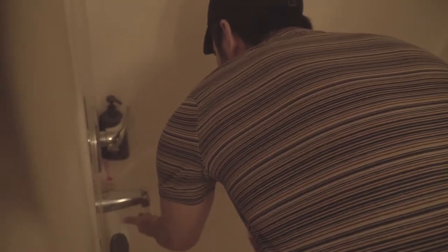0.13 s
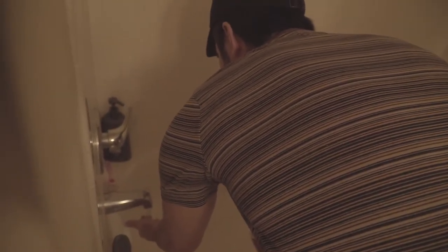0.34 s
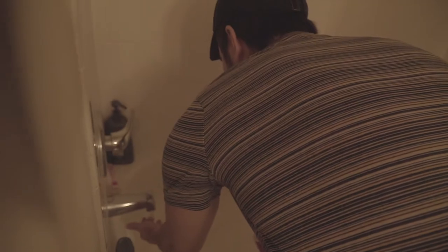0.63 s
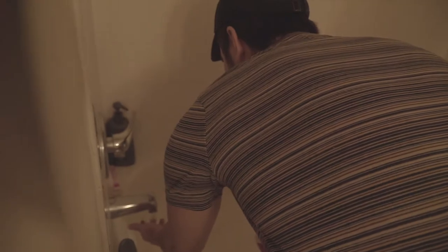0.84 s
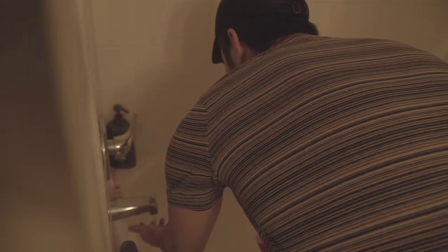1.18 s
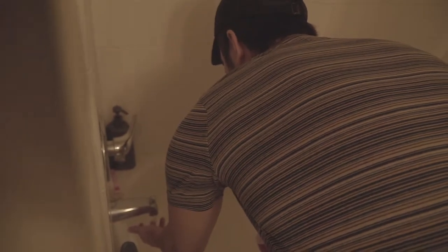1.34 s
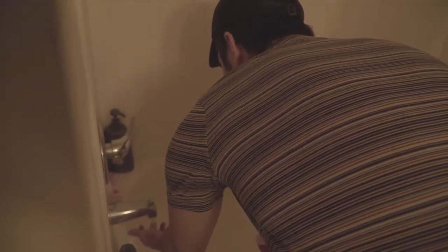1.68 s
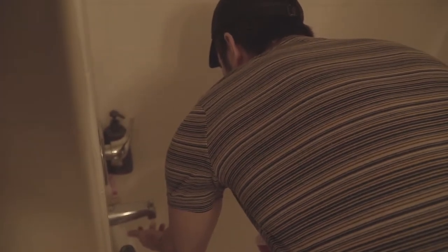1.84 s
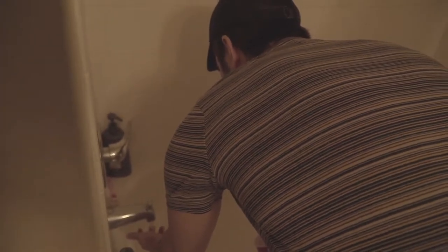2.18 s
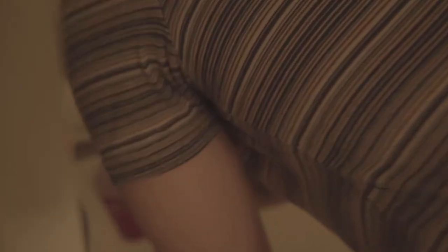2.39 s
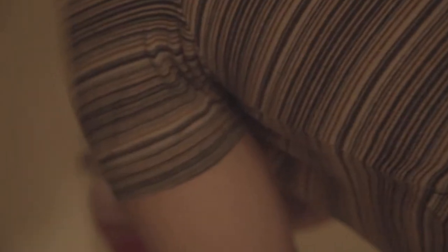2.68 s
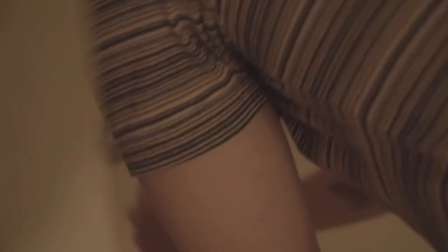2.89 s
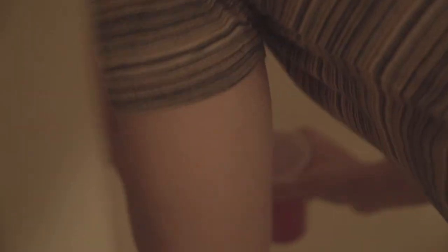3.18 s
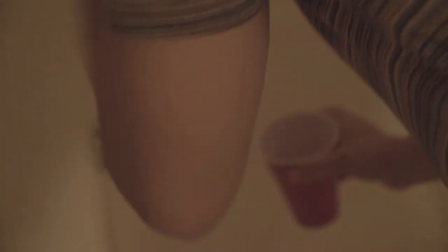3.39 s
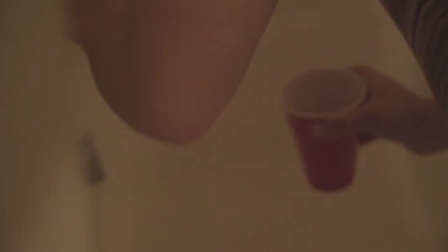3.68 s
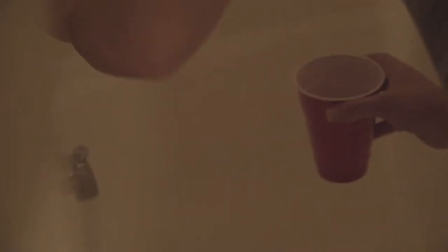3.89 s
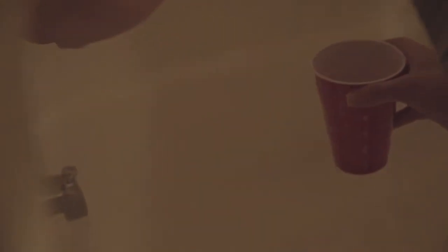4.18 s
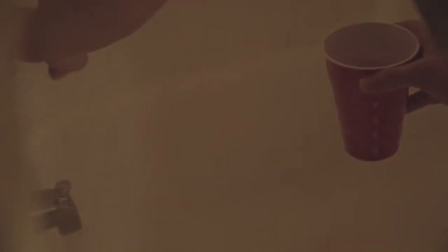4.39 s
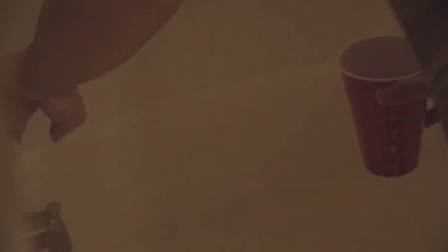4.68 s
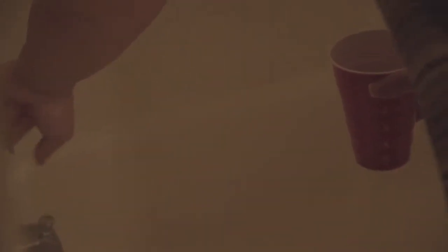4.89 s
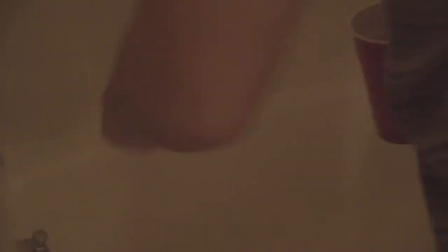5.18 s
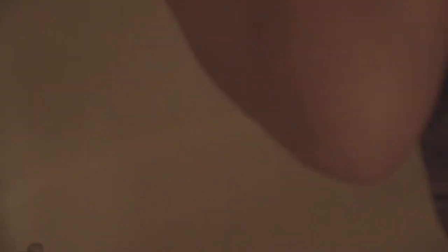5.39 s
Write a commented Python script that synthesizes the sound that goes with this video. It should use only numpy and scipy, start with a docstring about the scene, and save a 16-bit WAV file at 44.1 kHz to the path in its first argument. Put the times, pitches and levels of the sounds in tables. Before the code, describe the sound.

A bathtub faucet patters thinly, briefly fills a plastic cup, then splashes harder on the bare tub and dribbles to a stop.

```python
"""A bathtub faucet in a small tiled bathroom, heard on a stereo microphone. A thin stream patters on the tub
floor; trapped air rings as bubbles, lumps splat and heavy drops smack close by. At 2.3 s the scene changes with
a brief dip in level, and the water drums into a plastic cup, sounding its air column and its wall. From 3.1 s a
fuller stream slaps the bare tub and makes it ring. At 5 s it dribbles out in a few separate splashes and
singing air pockets, leaving the faint hush of the room."""
import sys
import numpy as np
from scipy import signal
from scipy.fft import rfft, irfft, next_fast_len
from scipy.io import wavfile
from scipy.ndimage import uniform_filter1d

SR = 44100
rng = np.random.default_rng(int(sys.argv[2]) if len(sys.argv) > 2 else 0)


def to_wav(s):
    """Save 16-bit WAV."""
    ch = np.atleast_2d(s).T  # columns
    pcm = np.round(np.clip(ch, -1, 1) * 32767)  # PCM
    wavfile.write(sys.argv[1], SR, pcm.astype(np.int16))


N = 244314


def from_db(db):
    """Decibels to gain."""
    return np.exp(np.asarray(db) * np.log(10) / 20)


def unit_rms(x):
    """Scale to rms 1."""
    return x / np.sqrt(np.mean(x ** 2) + 1e-20)


def eased(gain):
    """Smooth a gain: water never starts or stops in under 8 ms."""
    return uniform_filter1d(gain, size=350, mode="nearest")


def layer_gains(curve, layers=((0, 1),)):
    """Gains that follow a level curve, each offset from its median and taking a share of its swing."""
    time_s, level_db = np.transpose(curve)
    t = np.arange(N) / SR
    median_db = np.median(level_db)
    swing_db = np.interp(t, time_s, level_db) - median_db
    running = (t >= time_s[0]) & (t <= time_s[-1])
    return [eased(running * from_db(median_db + db + share * swing_db)) for db, share in layers]


def drift(rate_hz):
    """Slow random wander with a spread of 1."""
    r = np.exp(-80 * np.pi * rate_hz / SR)
    slow = signal.lfilter([1], [1, -2 * r, r * r], rng.standard_normal(N // 40 + 2002))[2000:]
    return np.interp(np.arange(N) / 40, np.arange(len(slow)), unit_rms(slow))


def resonance(x, hz, width_hz):
    """Two-pole resonance with gain 1 at its peak."""
    r = np.exp(-np.pi * width_hz / SR)
    poles = [1, -2 * r * np.cos(2 * np.pi * hz / SR), r * r]
    return signal.lfilter([(1 - r * r) / 2, 0, (r * r - 1) / 2], poles, x)


def ringing(x, modes):
    """A sound plus the resonances it excites in a body; rms 1."""
    return unit_rms(x + sum(from_db(db) * resonance(x, hz, width_hz) for hz, width_hz, db in modes))


def water(colour, low_hz, high_hz, drops_per_s, spread_db, hiss, patchy_db):
    """Drops of uneven size, each ringing in one third-octave band, over the hiss of finer ones; rms 1."""
    edges = np.geomspace(low_hz, high_hz, round(3 * np.log2(high_hz / low_hz)) + 1)
    hz, density_db = np.transpose(colour)
    shared_drift = drift(33.0)
    hisses = rng.standard_normal((2, N))
    out = 0
    for k, (low, high) in enumerate(zip(edges, np.minimum(edges[1:], .45 * SR))):
        fine = hisses[k % 2]   # neighbouring bands get unrelated hiss
        gap, size = rng.exponential(1, (2, 20000))
        at = (np.cumsum(gap) * SR / drops_per_s).astype(int)
        size, at = size[at < N], at[at < N]
        drops = np.zeros(N)
        drops[at] = np.sign(fine[at]) * from_db(spread_db * np.minimum(size, 5))
        bandpass = signal.butter(2, [low, high], "band", fs=SR, output="sos")
        band = signal.sosfilt(bandpass, unit_rms(drops) + hiss * fine)
        band_db = np.interp(np.log(low * high) / 2, np.log(hz), density_db)
        wander_db = patchy_db * (0.5 * shared_drift + drift(10.7))
        out = out + from_db(band_db + wander_db) * np.sqrt(high - low) * unit_rms(band)
    return unit_rms(out)


# Spectrum of the quiet bathroom: frequency_hz, density_db
HUSH_COLOUR = [(30, -40), (80, -35), (130, -4), (300, -4), (1000, 3.5), (2300, -5.5), (8000, -36),
               (15900, -36)]


def room_hush(level_db=-66.5):
    """The faint, steady background of the room."""
    return from_db(level_db) * water(HUSH_COLOUR, 30, 16000, 3000, spread_db=0, hiss=5, patchy_db=0)


def deep_rumble(level_db=-89, swing_db=7, top_hz=45, fade_from_s=4.5, fade_db_per_s=25):
    """A faint lumpy rumble far below the water; it dies with the flow."""
    bass = signal.sosfilt(signal.butter(2, top_hz, fs=SR, output="sos"), rng.standard_normal(N))
    fade_db = fade_db_per_s * np.maximum(np.arange(N) / SR - fade_from_s, 0)
    return from_db(level_db + swing_db * drift(5.4) - fade_db) * unit_rms(bass)


# Force of the thin stream on the tub floor: time_s, level_db
THIN_FORCE = [(0.0, -34), (0.03, -37.5), (0.11, -40), (0.11, -34.5), (0.23, -41), (0.27, -37),
              (0.72, -38.5), (0.79, -49), (0.82, -40.5), (1.29, -44.5), (1.33, -50.5), (1.42, -43.5),
              (1.55, -53), (1.56, -47), (1.79, -44.5), (2.28, -42.5), (2.29, -45.5), (2.3, -58)]
# Its splash, spray and tub rumble, a row each: offset_db, swing_share
THIN_LAYERS = [(-5.5, 0.55), (-3, 0.44), (-15, 0.4)]
# Spectrum of the patter: frequency_hz, density_db
THIN_COLOUR = [(35, -73), (60, -43), (91, -41), (140, -24), (184, -8.5), (255, -8), (606, -2.5), (1140, -8),
               (1340, -5), (1620, -14), (3110, -7.5), (8290, -9.5), (14200, -22), (15900, -22)]


def thin_stream():
    """Patter on the tub floor: splash, fine spray and the dull sound of the tub."""
    splash_gain, spray_gain, rumble_gain = layer_gains(THIN_FORCE, THIN_LAYERS)
    splash = water(THIN_COLOUR, 1563, 4430, 500, spread_db=1.5, hiss=0.54, patchy_db=-1.0)
    spray = water(THIN_COLOUR, 4510, 16000, 900, spread_db=9.5, hiss=3.9, patchy_db=1.5)
    rumble = water(THIN_COLOUR, 62, 1545, 200, spread_db=2.5, hiss=2.2, patchy_db=-1.7)
    return splash_gain * splash + spray_gain * spray + rumble_gain * rumble


# Heavy drops on a hard surface close to the microphone: start_s, level_db, pitch_hz
SMACKS = [(.0027, -25, 3040), (0.3582, -29, 3010), (0.8258, -37, 2200), (.8315, -30, 2560),
          (0.974, -35, 3300), (.978, -30, 2890), (0.994, -38.5, 2700), (1.1627, -33, 4220),
          (2.428, -35, 1290), (3.1683, -17, 3670), (3.1785, -17, 5000), (3.449, -21, 2100),
          (3.459, -20, 1890), (3.4863, -20, 2150), (4.167, -29, 1930), (4.181, -23, 1900),
          (4.5167, -22, 4050), (4.998, -31, 5900), (5.0598, -21, 3500), (5.065, -32, 3500),
          (5.068, -29, 3200), (5.0711, -22, 3050), (5.076, -22, 3000), (5.091, -26, 3100),
          (5.172, -33, 3500), (5.1818, -21.5, 3790), (5.219, -36, 3500), (5.3015, -42, 4000)]


def smacks(ring_cycles=3.8):
    """Each drop strikes a burst of a few cycles that swells and dies at once."""
    out, t = np.zeros(N + 400), np.arange(400) / SR
    for (start_s, db, hz), phase in zip(SMACKS, rng.random(len(SMACKS))):
        swell = 4 * t * hz / ring_cycles
        envelope = from_db(db) * (swell * np.exp(1 - swell)) ** 2
        at = round(start_s * SR)
        out[at:at + 400] += envelope * np.sin(2 * np.pi * (hz * t + phase))
    return out[:N]


def plops(rows, width_share, rise_share, spread_db=1.5):
    """A quick swell, then a dying flurry of uneven droplets, all at the pitch of the trapped air."""
    out, t = np.zeros(N + 8000), np.arange(8000) / SR
    sizes = from_db(spread_db * np.minimum(rng.exponential(1, (len(rows), 8000)), 5))
    flurries = sizes * rng.standard_normal(sizes.shape)
    for (start_s, db, hz, t60_s), flurry in zip(rows, flurries):
        width_hz = width_share * hz
        ring = unit_rms(resonance(resonance(flurry, hz, width_hz), hz, 2 * width_hz))
        attack = np.minimum(t / (rise_share * t60_s), 1)
        envelope = attack * from_db(db - 4.5 - 60 * (t / t60_s) ** 1.213)
        at = round(start_s * SR)
        out[at:at + 8000] += unit_rms(envelope * ring) * np.sqrt(np.mean(envelope ** 2))
    return out[:N]


# Bubbles where the water lands, and narrow spatters at the cup's rim: start_s, level_db, pitch_hz, t60_s
BUBBLES_AND_SPATTERS = [(0.003, -33, 3040, 0.12), (0.085, -26, 4260, 0.078), (0.103, -30, 4120, 0.078),
                        (0.348, -28.5, 3000, 0.052), (0.397, -39, 1360, 0.082), (0.434, -32.5, 1345, 0.078),
                        (0.354, -35, 1930, 0.06), (0.68, -37.5, 960, 0.039), (1.677, -41.5, 1420, 0.06),
                        (2.325, -59, 9000, .12), (2.33, -52, 7200, .12), (2.428, -58, 7300, .2), (2.5, -50, 7050, .2),
                        (2.53, -48, 11700, .08), (2.62, -64, 9200, 0.09), (2.715, -56, 8300, 0.11),
                        (2.72, -54, 6900, .1), (2.87, -47, 5200, 0.079), (2.9, -46, 6360, .14), (2.97, -57, 8800, 0.1),
                        (2.51, -42, 1016, 0.19), (2.522, -31.5, 293, 0.053), (2.642, -30, 288, 0.11),
                        (2.685, -32, 280, 0.2), (2.74, -46, 282, 0.28), (2.96, -41, 970, 0.14),
                        (2.796, -40, 5500, 0.051), (3.68, -38.5, 825, 0.21), (5.059, -26.5, 4620, 0.073),
                        (5.065, -48, 1990, 0.25), (5.2, -33, 5800, 0.063), (5.375, -49, 1400, 0.061),
                        (5.48, -59, 1010, 0.068)]


def bubbles_and_spatters():
    """Trapped air, and spatter at the cup's rim, rings in a narrow band with a clear pitch."""
    return plops(BUBBLES_AND_SPATTERS, width_share=0.061, rise_share=0.086)


# Lumps of water landing: start_s, level_db, centre_hz, t60_s
SPLATS = [(0.045, -37.5, 3130, .1), (0.065, -28, 4100, 0.16), (0.27, -35.5, 2820, 0.19),
          (0.52, -33, 3030, .05), (0.435, -35, 2350, 0.098), (0.575, -37, 1850, 0.081),
          (0.8, -41, 2080, 0.092), (0.822, -35, 2480, 0.026), (0.972, -37, 3300, 0.082),
          (1.0, -40.5, 2680, 0.067), (1.17, -41, 3840, 0.069), (1.57, -40, 14000, 0.073),
          (1.734, -36, 3000, 0.12), (1.83, -36, 3730, 0.095), (1.9, -48, 5400, 0.039),
          (1.93, -42, 14500, 0.063), (2.05, -29, 2820, 0.024), (2.1, -36, 2460, 0.072),
          (2.31, -38, 2960, 0.12), (2.35, -50, 2500, 0.087), (2.427, -34.5, 1100, 0.095),
          (2.47, -34.5, 1040, 0.061), (2.55, -35, 1050, 0.066), (2.5, -49, 3500, .08),
          (2.62, -53, 3400, 0.074), (2.77, -45, 3580, 0.11), (2.84, -46, 3550, 0.07),
          (2.64, -49, 5200, .08), (2.786, -32.5, 1465, 0.09), (2.971, -38.5, 3270, 0.1),
          (3.168, -26, 3900, 0.22), (3.24, -25, 1810, 0.14), (3.4, -27, 1700, 0.13),
          (3.41, -27, 5800, 0.085), (3.448, -20, 2130, 0.022), (3.458, -24, 1880, 0.11),
          (3.48, -37, 2300, 0.062), (3.5, -24.5, 1350, 0.043), (3.6, -33, 6740, 0.055),
          (3.73, -24, 3080, 0.038), (3.745, -22, 6360, 0.065), (3.826, -28.5, 1990, 0.21),
          (3.95, -27, 3270, 0.047), (4.0, -25, 1670, 0.023), (4.09, -29, 3030, 0.14),
          (4.135, -25, 2280, 0.1), (4.162, -22, 1960, 0.092), (4.18, -30, 1740, 0.11),
          (4.265, -17, 5700, .024), (4.205, -35, 2450, 0.083), (4.25, -28, 2280, 0.09),
          (4.29, -25.5, 2150, 0.13), (4.36, -23, 3400, .05), (4.42, -27, 4000, 0.036),
          (4.424, -25, 1860, 0.076), (4.448, -26, 2400, .05), (4.515, -25, 1770, 0.083),
          (4.51, -27, 2850, 0.15), (4.54, -27, 2370, 0.064), (4.57, -25.5, 2900, 0.088),
          (4.714, -23.5, 8650, 0.13), (4.74, -28, 2200, 0.1), (4.74, -38, 5900, 0.082),
          (4.82, -28.5, 2580, 0.15), (4.885, -26, 8900, 0.17), (4.997, -28.5, 5800, 0.084),
          (5.008, -35, 3000, 0.1), (5.01, -39, 1980, 0.49), (5.035, -30, 4600, 0.066),
          (5.059, -21, 3380, 0.047), (5.065, -21, 3200, 0.044), (5.085, -28, 3150, 0.082),
          (5.112, -32, 3240, 0.06), (5.171, -35, 3500, 0.035), (5.178, -23.5, 3700, 0.026),
          (5.195, -29, 3500, 0.084), (5.307, -37, 6500, 0.049), (5.306, -34, 12400, 0.039),
          (5.312, -28.5, 9650, 0.073), (5.435, -52, 2170, 0.085)]


def splats():
    """Lumps of water splat in a broad band, with only a hint of pitch."""
    return plops(SPLATS, width_share=0.21, rise_share=0.076)


# Level of everything at the microphone: time_s, gain_db
OVERALL_LEVEL = [(0, 1), (2.285, 2.5), (2.303, -1), (2.312, -9.5), (2.34, 0.5), (5.54, -1.5)]


def level_dip():
    """A slowly sloping gain that dips briefly where the scene changes to the cup."""
    return layer_gains(OVERALL_LEVEL)[0]


# Gurgling down in the cup: time_s, level_db
GURGLE = [(2.31, -50), (2.335, -48), (2.562, -43), (2.588, -45.5), (2.704, -42.5), (2.716, -44),
          (3.12, -47)]
# Spectrum of the gurgle: frequency_hz, density_db
GURGLE_COLOUR = [(35, -81), (60, -56), (130, -20), (189, 4.5), (231, -18), (282, 1), (429, 4), (532, 0.5),
                 (687, 0.5), (924, 0.5), (1500, -10.5), (1950, -44), (3300, -120)]
# Modes of the cup's air column: pitch_hz, width_hz, gain_db
CUP_AIR_MODES = [(280, 55, 0), (560, 89, -0.5), (970, 200, -3)]
# Water spitting at the rim: time_s, level_db
RIM_SPIT = [(2.304, -66), (2.36, -60), (2.42, -64), (2.44, -58.5), (2.6, -58.5), (2.64, -52.5),
            (2.68, -64.5), (2.73, -60.5), (2.78, -69), (2.86, -61.5), (2.89, -46.5), (2.94, -59),
            (2.99, -73), (3.09, -70)]
# Its splash and spray, a row each: offset_db, swing_share
RIM_LAYERS = [(8.5, 0.31), (3.5, 0.75)]
# Spectrum of the spitting: frequency_hz, density_db
RIM_COLOUR = [(710, -29), (1200, 0.5), (2200, -7.5), (2620, -14), (3010, -15), (3280, -13), (3990, -21.5),
              (5460, -26), (7890, -31), (11900, -31), (15900, -49)]
# Modes of the plastic wall: pitch_hz, width_hz, gain_db
CUP_WALL_MODES = [(2670, 240, 5), (3100, 150, 3), (3550, 180, 13)]
# High rings of the same wall: pitch_hz, width_hz, gain_db
CUP_HIGH_MODES = [(5960, 500, -12), (7200, 500, -7), (8850, 600, -5), (11800, 700, -14)]


def cup():
    """Bubbles driven into the cup sound its air column; water spits at the rim and rings its wall."""
    gurgle_gain = layer_gains(GURGLE)[0]
    splash_gain, spray_gain = layer_gains(RIM_SPIT, RIM_LAYERS)
    gurgle = water(GURGLE_COLOUR, 59.7, 1347, 250, spread_db=0.5, hiss=0.87, patchy_db=0.2)
    splash = water(RIM_COLOUR, 1370, 4230, 550, spread_db=9.5, hiss=1.24, patchy_db=0.1)
    spray = water(RIM_COLOUR, 4100, 16600, 400, spread_db=3.0, hiss=0.8, patchy_db=2.4)
    return (gurgle_gain * ringing(gurgle, CUP_AIR_MODES)
            + splash_gain * ringing(splash, CUP_WALL_MODES)
            + spray_gain * ringing(spray, CUP_HIGH_MODES))


# Heavy lumps of the full stream slapping the bare tub: time_s, level_db
FULL_SLAP = [(3.09, -69), (3.1, -51), (3.12, -43.5), (3.184, -35.5), (3.236, -42), (3.252, -40.5),
             (3.326, -41.5), (3.41, -34), (3.432, -46), (3.452, -34.5), (3.648, -42.5), (3.736, -37.5),
             (3.816, -43.5), (3.848, -39), (3.926, -47), (4.01, -42.5), (4.048, -44), (4.158, -34.5),
             (4.42, -39), (4.426, -37), (4.506, -41.5), (4.52, -40.5), (4.706, -43.5), (4.768, -39),
             (4.8, -43), (4.836, -47), (4.964, -53.5), (4.98, -63)]
# Their splash: time_s, level_db
FULL_SPLASH = [(3.09, -63), (3.12, -35), (3.158, -39), (3.178, -33.5), (3.32, -36.5), (3.426, -32),
               (3.452, -36), (3.616, -35), (3.642, -37), (3.762, -33), (3.774, -40), (3.794, -33),
               (3.848, -39.5), (3.89, -34), (4.032, -36.5), (4.2, -31.5), (4.252, -38), (4.268, -35),
               (4.284, -34), (4.316, -31), (4.416, -37.5), (4.426, -31), (4.458, -36.5), (4.558, -33.5),
               (4.678, -35), (4.764, -31.5), (4.8, -38), (4.864, -40.5), (4.884, -32), (4.98, -53.5)]
# Their fine spray: time_s, level_db
FULL_SPRAY = [(3.09, -62), (3.126, -37.5), (3.258, -35), (3.29, -39), (3.4, -33), (3.452, -41),
              (3.484, -35), (3.578, -39.5), (3.61, -31.5), (3.648, -40.5), (3.768, -35), (3.842, -40.5),
              (3.906, -36), (3.974, -39.5), (4.0, -30), (4.016, -35), (4.162, -36), (4.2, -31.5),
              (4.268, -35.5), (4.368, -33), (4.49, -36.5), (4.568, -33), (4.636, -42.5), (4.658, -36),
              (4.748, -36.5), (4.836, -46), (4.874, -46), (4.89, -45), (4.936, -54), (4.98, -66)]
# The tub drumming underneath: time_s, level_db
FULL_RUMBLE = [(3.1, -61), (3.13, -44.5), (3.356, -49), (3.408, -42.5), (3.424, -49.5), (3.648, -49.5),
               (3.686, -48), (3.936, -56), (3.968, -51), (4.246, -48.5), (4.272, -55.5), (4.528, -49.5),
               (4.822, -65), (4.98, -74)]
# Spectrum of slap, splash and spray: frequency_hz, density_db
FULL_COLOUR = [(650, -46), (1100, -42), (1330, -35), (1450, -16), (1570, -19.5), (1700, -8), (4260, -9),
               (5960, -5), (7450, 0), (9320, 2.5), (12500, -4.5), (14900, -8), (15900, -21)]
# Spectrum of the drumming: frequency_hz, density_db
RUMBLE_COLOUR = [(35, -70), (60, -42), (113, -21), (189, -5), (266, -1.5), (375, -0.5), (488, 2),
                 (564, 3.5), (1100, -7.5), (1400, -29), (1820, -35), (3080, -120)]
# Hollow ring of the tub: pitch_hz, width_hz, gain_db
TUB_MODES = [(1470, 22, -4), (1735, 30, -3), (1920, 26, 3), (2170, 34, -22), (2220, 15, -4),
             (2540, 47, -14), (2770, 73, 0)]
# Low ring of the tub floor: pitch_hz, width_hz, gain_db
TUB_FLOOR_MODES = [(360, 95, 1.5), (580, 21, 2), (977, 200, 3.5)]


def full_stream():
    """The stream breaks into lumps that slap the tub, make it drum and throw spray, then dribbles out."""
    flow = [layer_gains(curve)[0] for curve in (FULL_SLAP, FULL_SPLASH, FULL_SPRAY, FULL_RUMBLE)]
    slap_gain, splash_gain, spray_gain, rumble_gain = np.add(flow, dribble())
    slap = water(FULL_COLOUR, 1310, 3490, 350, spread_db=1.0, hiss=0.69, patchy_db=-1.0)
    splash = water(FULL_COLOUR, 3320, 6720, 700, spread_db=2.5, hiss=0.95, patchy_db=0.6)
    spray = water(FULL_COLOUR, 7100, 16000, 820, spread_db=5.0, hiss=2.24, patchy_db=0.9)
    rumble = water(RUMBLE_COLOUR, 63.3, 1324, 300, spread_db=3.5, hiss=1.24, patchy_db=2.0)
    return (slap_gain * ringing(slap, TUB_MODES)
            + splash_gain * splash
            + spray_gain * spray
            + rumble_gain * ringing(rumble, TUB_FLOOR_MODES))


# Slap, splash, spray and rumble of the last water, a row each: level_db, fade_db_per_s
DRIBBLE = [(-48, 47.5), (-48, 52), (-54, 47), (-70.5, 29)]


def dribble(start_s=4.99):
    """Gains of what still runs from the tap once the stream is off: each layer fades steadily."""
    since_s = np.arange(N) / SR - start_s
    return [eased((since_s > 0) * from_db(db - fade * np.abs(since_s))) for db, fade in DRIBBLE]


# Air pockets close to the microphone: start_s, length_s, level_db, pitch_hz, width_hz
GULPS = [(5.036, 0.044, -49.5, 820, 40), (5.194, 0.013, -48, 1280, 94), (5.303, 0.036, -43.5, 4120, 500),
         (5.33, .036, -49.5, 4060, 500), (5.306, 0.025, -53, 1390, 150)]


def gulps(edge_s=0.005, steadiness=0.7):
    """Pockets of air sing at a wavering pitch for a moment, then close."""
    out, t = np.zeros(N + 6000), np.arange(6000) / SR
    for start_s, length_s, db, hz, width_hz in GULPS:
        noise = rng.standard_normal(12000)
        tone = resonance(resonance(noise, hz, width_hz), hz, 2 * width_hz)[6000:]
        tone /= (np.abs(signal.hilbert(tone)) + 1e-9) ** steadiness   # evens out the loudness
        gate = np.clip(np.minimum(t, length_s + edge_s - t) / edge_s, 0, 1)
        at = round(start_s * SR)
        out[at:at + 6000] += from_db(db) * gate * tone / np.sqrt(np.mean(tone[gate > 0] ** 2))
    return out[:N]


def tile_echoes(bass_t60_s=0.14, middle_t60_s=0.21, treble_t60_s=0.16):
    """Mid and side echo tails of one spot in the room, dying away in three bands; unit energy."""
    t = np.arange(SR // 2) / SR
    noise = rng.standard_normal((2, len(t)))
    dull = signal.lfilter(*signal.butter(1, 6000, fs=SR), noise)
    bass = signal.lfilter(*signal.butter(2, 1500, fs=SR), dull)
    tail = (bass * from_db(-60 * t / bass_t60_s)
            + (dull - bass) * from_db(-60 * t / middle_t60_s)
            + (noise - dull) * from_db(-60 * t / treble_t60_s))
    return tail / np.sqrt(np.sum(tail ** 2, axis=1, keepdims=True))


# How the echoes differ between the microphone's two ports: frequency_hz, side_gain_db
STEREO_WIDTH = [(60, -12), (90, -28), (130, -42), (200, -61), (330, -22), (500, -17), (900, -14.5),
                (1400, -13), (1900, -17), (2300, -5.5), (4200, -4.5), (9800, -2), (15000, -2)]


def bathroom(far, near, spots=7, room_db=-3, near_send_db=-7, balance_db=-1, lean_from_hz=480):
    """Water lands on ever-changing spots, each with its own echoes; close sounds stir the room less."""
    size = next_fast_len(N + SR // 2)
    shares = np.array([drift(11.6) for _ in range(spots)])
    shares /= np.sqrt(np.sum(shares ** 2, axis=0))
    into_room = far + from_db(near_send_db) * near
    spectra = sum(rfft(into_room * share, size) * rfft(tile_echoes(), size) for share in shares)
    hz, side_db = np.transpose(STEREO_WIDTH)
    bin_hz = np.arange(size // 2 + 1) * SR / size
    spectra[1] *= from_db(np.interp(np.log(1 + bin_hz), np.log(hz), side_db))
    echoes, side = irfft(spectra, size)[:, :N]
    mid = (far + from_db(room_db) * echoes) / np.sqrt(1 + from_db(2 * room_db)) + near
    highs = signal.lfilter(*signal.butter(1, lean_from_hz, "high", fs=SR), mid)
    side += (from_db(balance_db / 2) - 1) * highs   # the right port is slightly louder
    return np.array([mid + side, mid - side])


def scene(cup_from_s=2.306):
    """All the water as it reaches the microphone, over the hush of the room."""
    hush = room_hush() + deep_rumble()
    drops = bubbles_and_spatters() + splats()
    near = smacks() + gulps()
    later = np.arange(N) > cup_from_s * SR
    opening = bathroom(thin_stream() + hush + drops * ~later, near * ~later)
    ending = bathroom(cup() + full_stream() + hush + drops * later, near * later)
    return level_dip() * np.where(later, ending, opening)   # the thin stream's echoes end at the dip


def record(dry, low_cut_hz=127, stopband_hz=16250):
    """The microphone loses the deep bass; the top is cut steeply."""
    thinned = signal.sosfilt(signal.butter(2, low_cut_hz, "high", fs=SR, output="sos"), dry)
    return signal.sosfilt(signal.cheby2(16, 70, stopband_hz, fs=SR, output="sos"), thinned)


dry = scene()
out = record(dry)
to_wav(out)
```